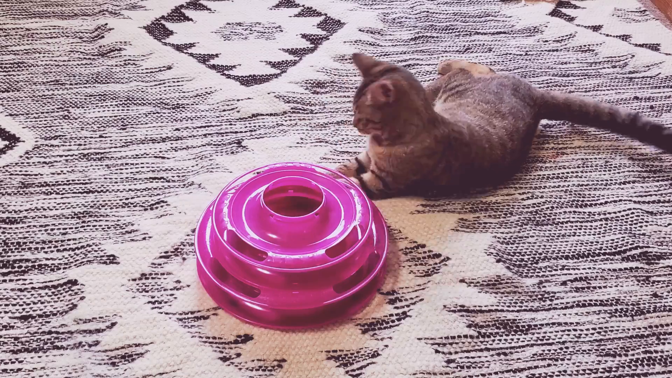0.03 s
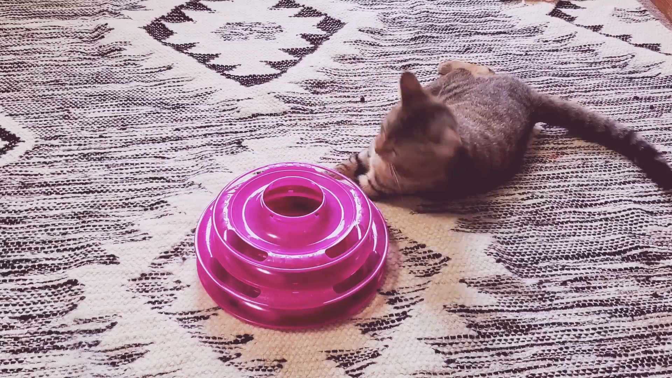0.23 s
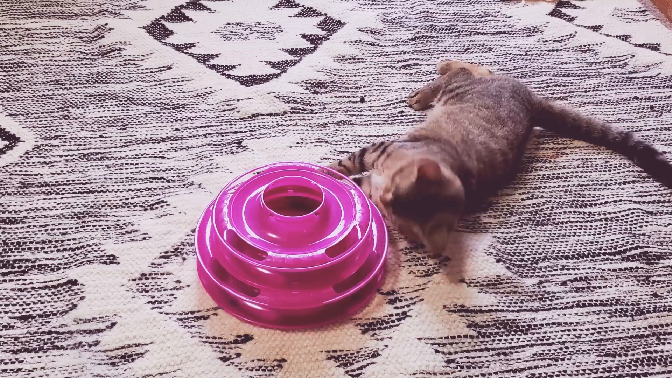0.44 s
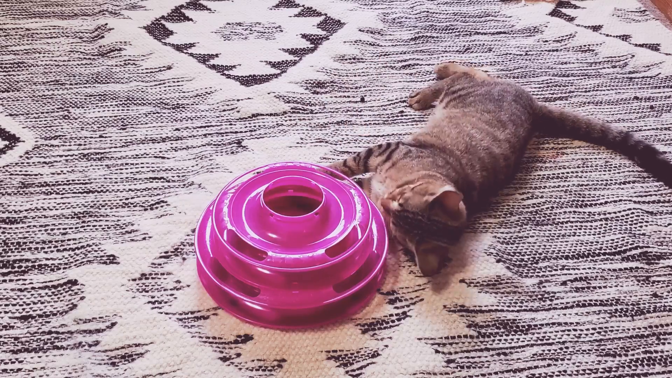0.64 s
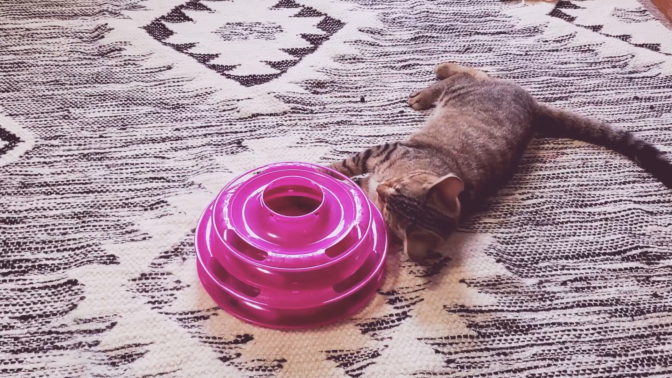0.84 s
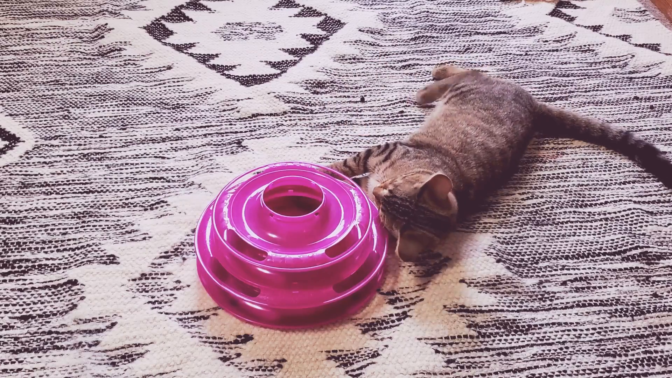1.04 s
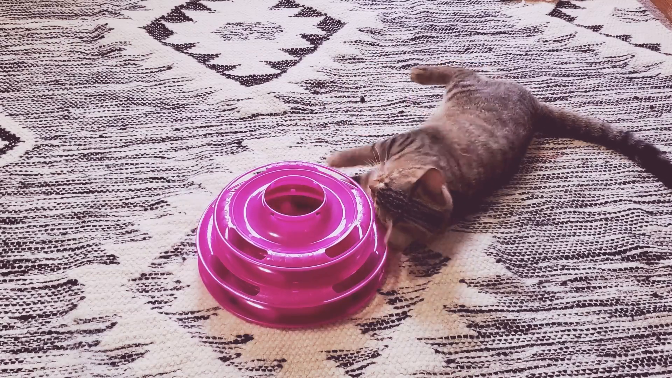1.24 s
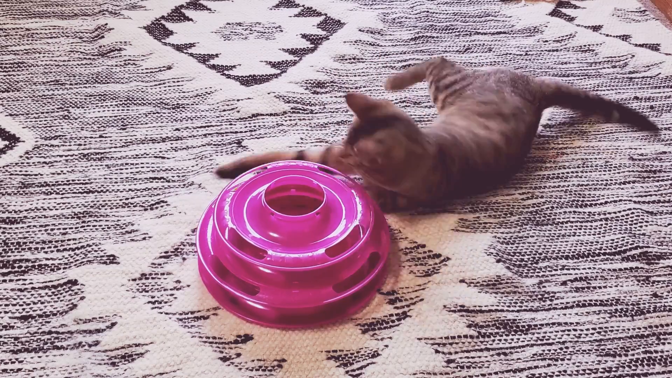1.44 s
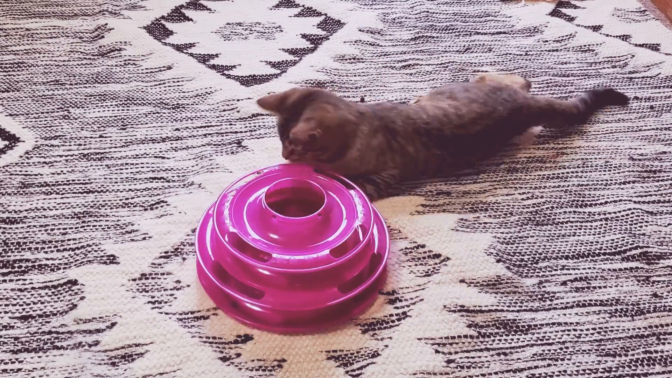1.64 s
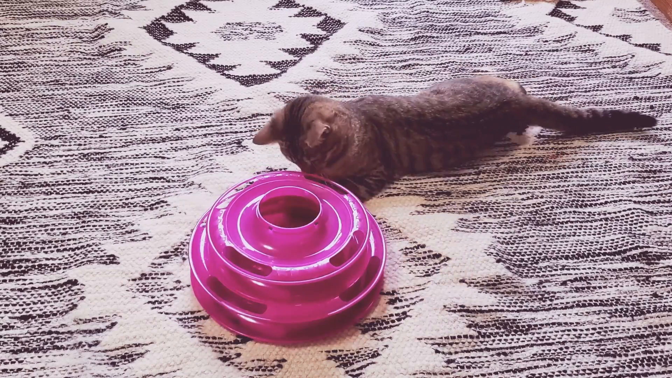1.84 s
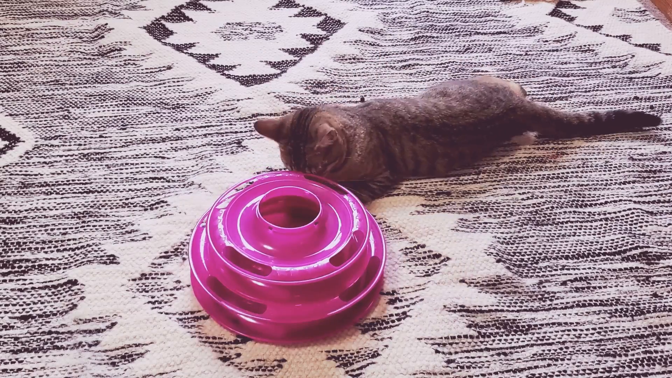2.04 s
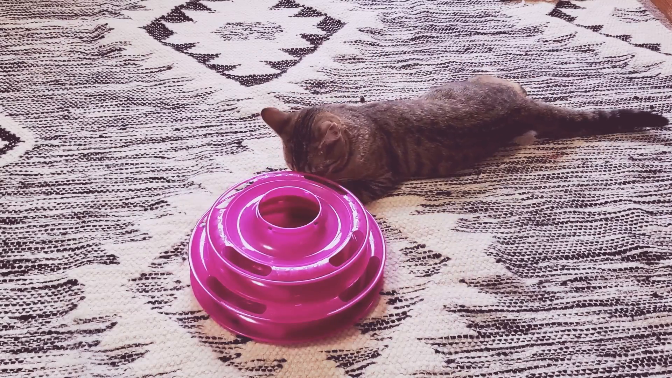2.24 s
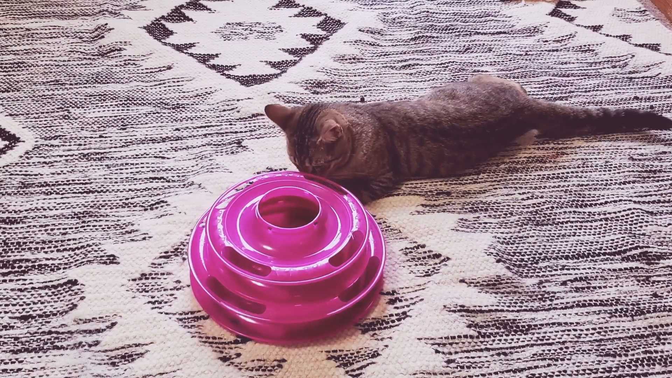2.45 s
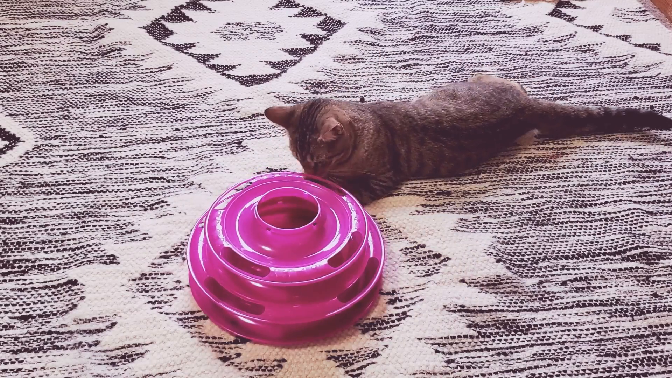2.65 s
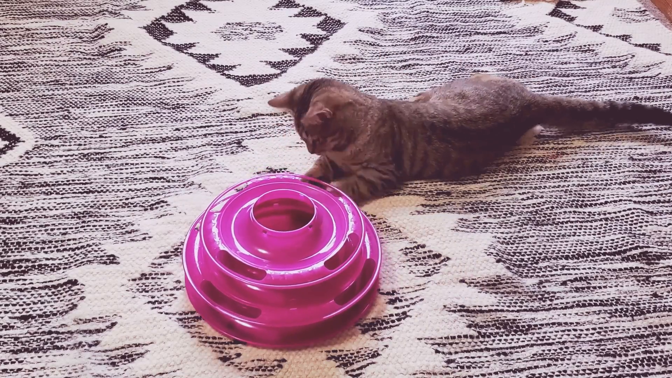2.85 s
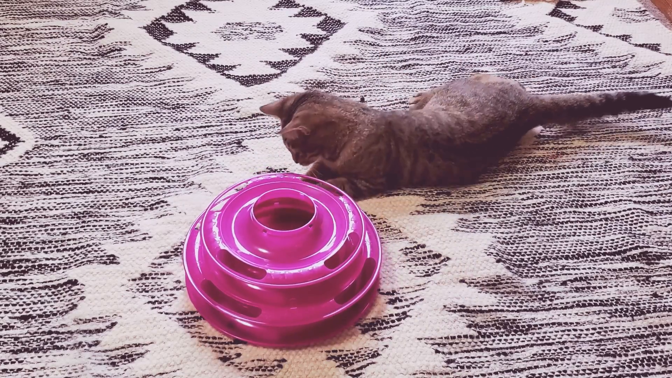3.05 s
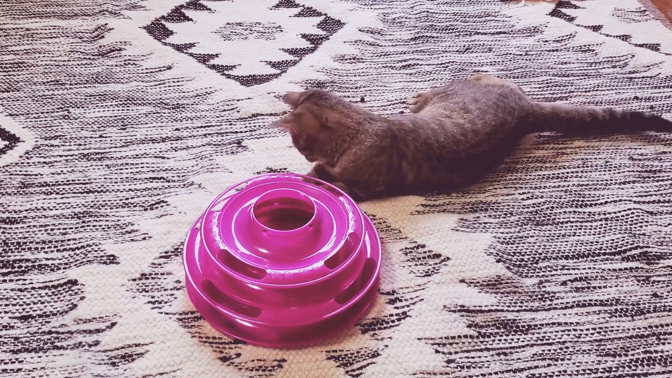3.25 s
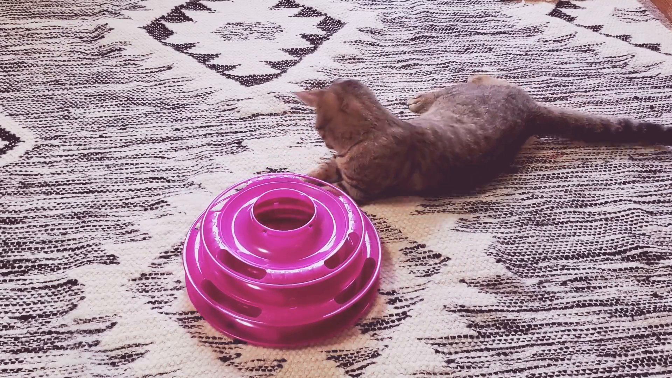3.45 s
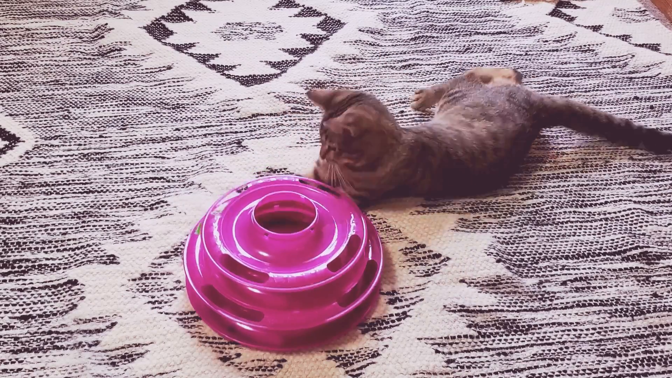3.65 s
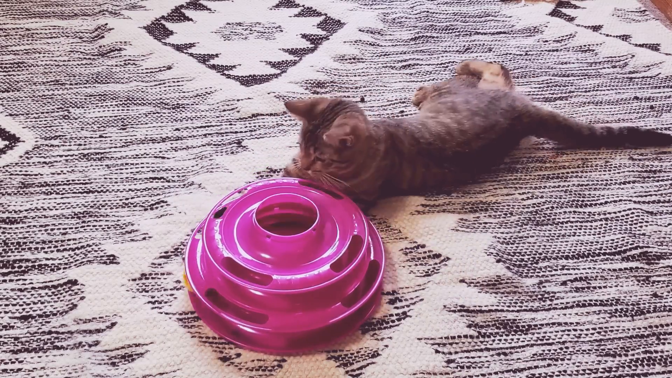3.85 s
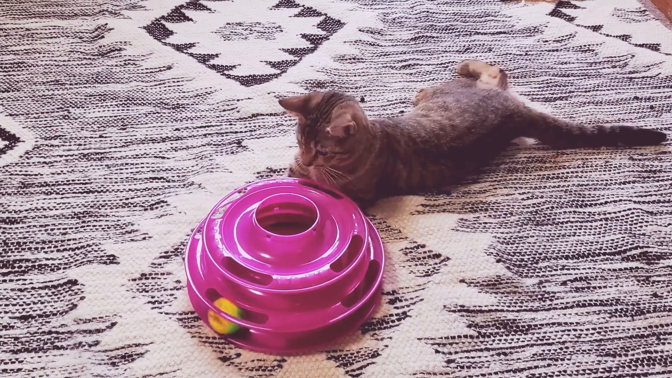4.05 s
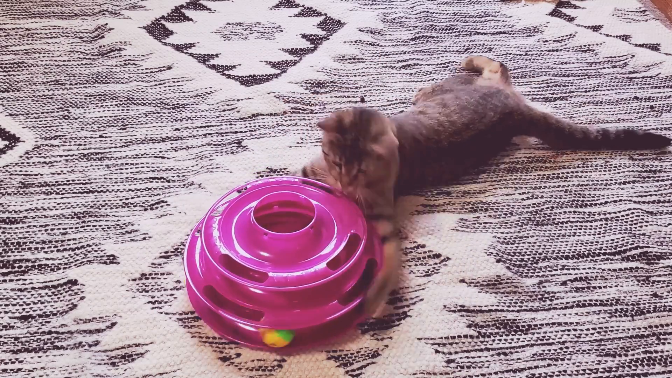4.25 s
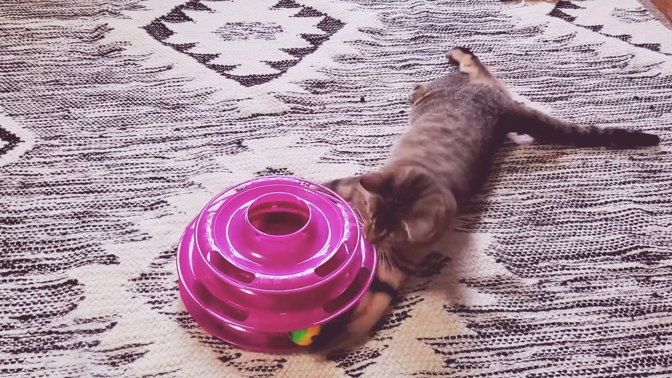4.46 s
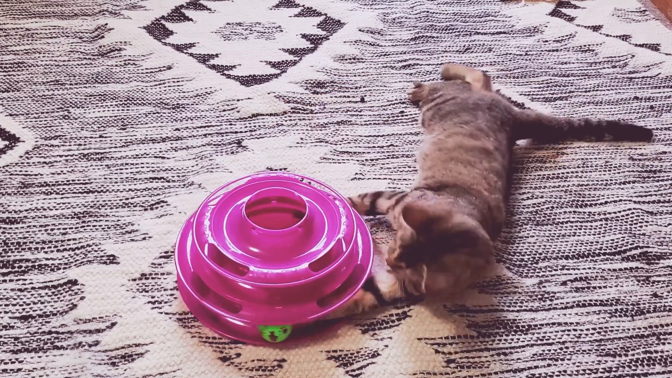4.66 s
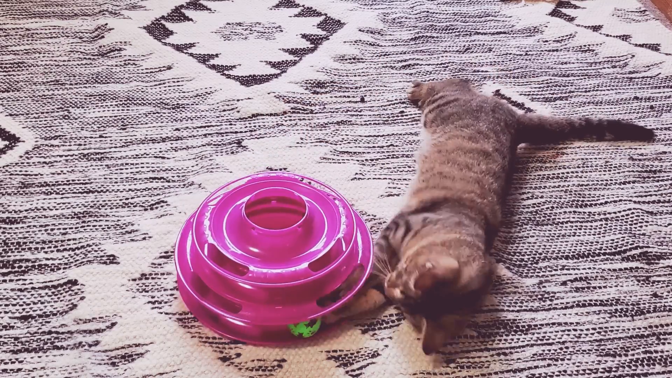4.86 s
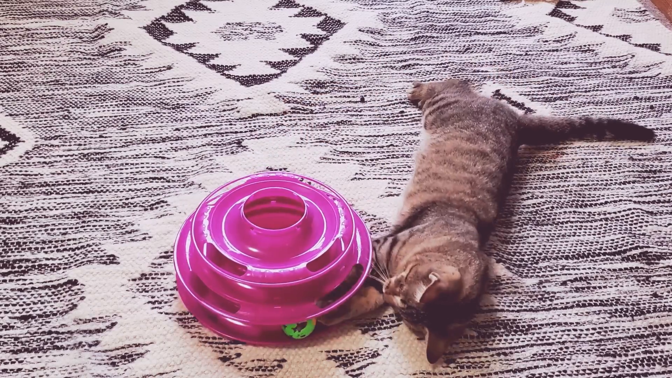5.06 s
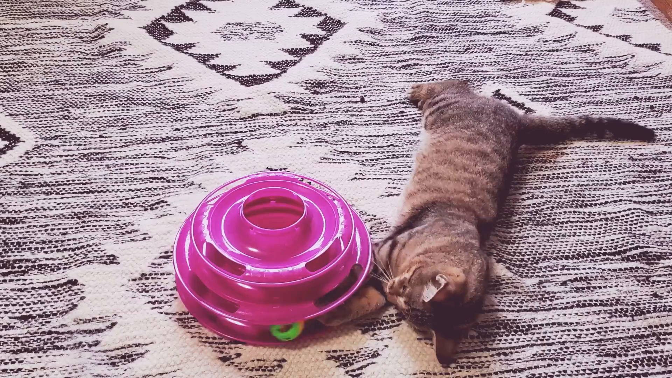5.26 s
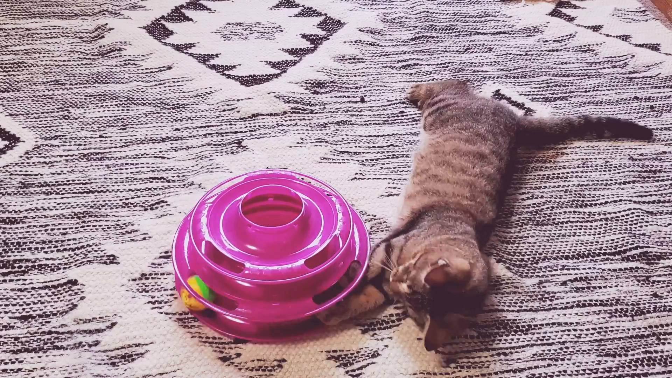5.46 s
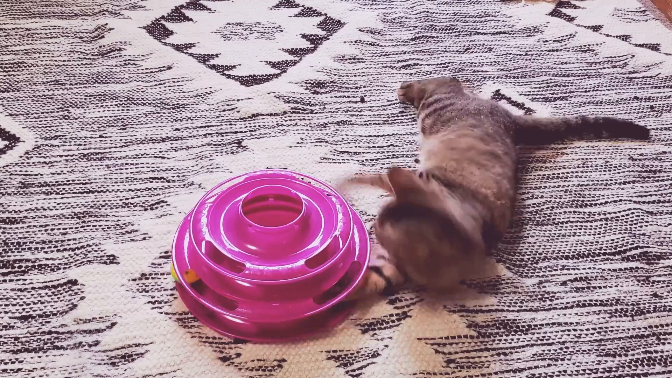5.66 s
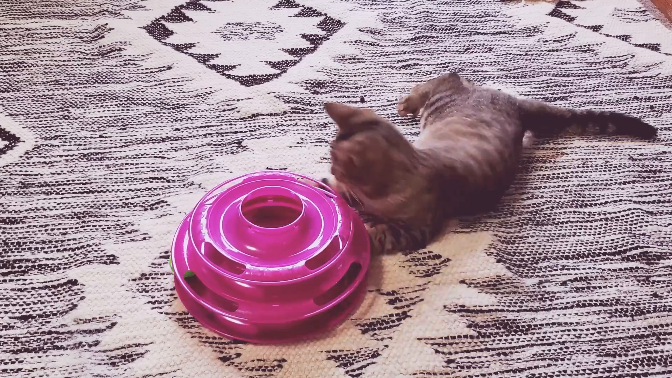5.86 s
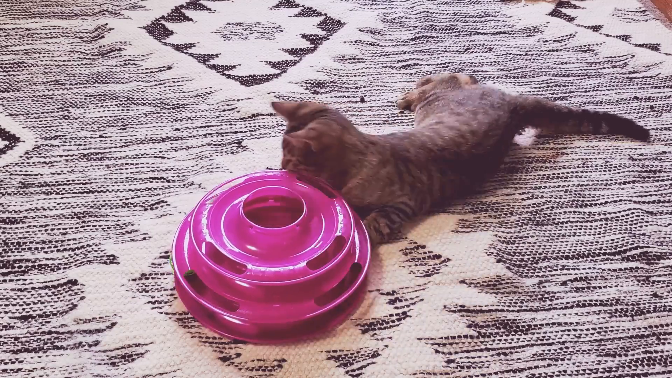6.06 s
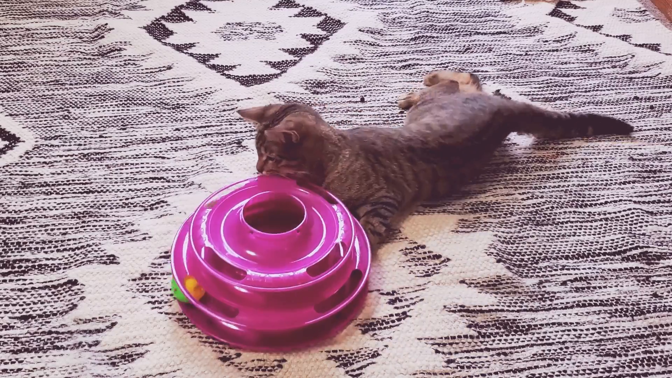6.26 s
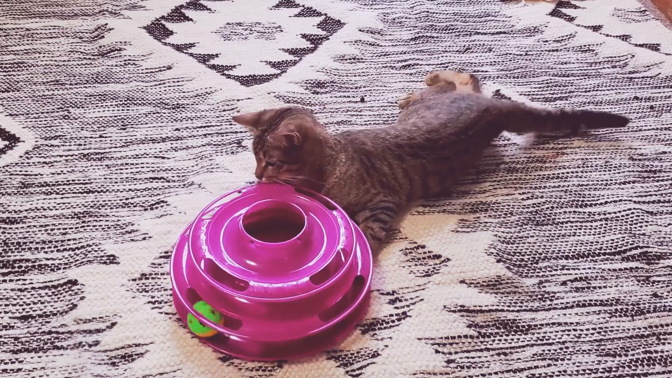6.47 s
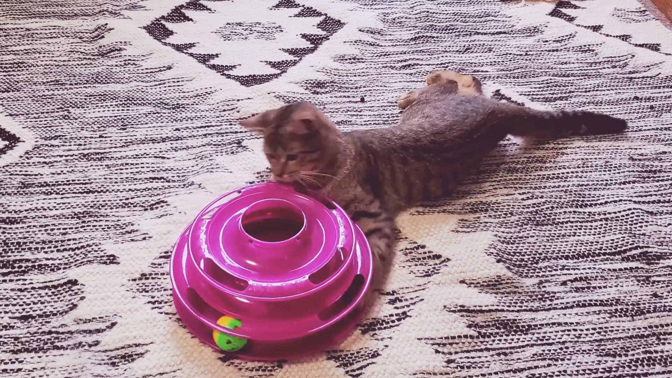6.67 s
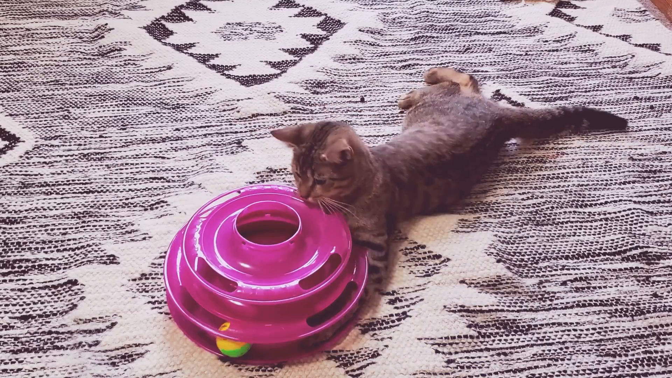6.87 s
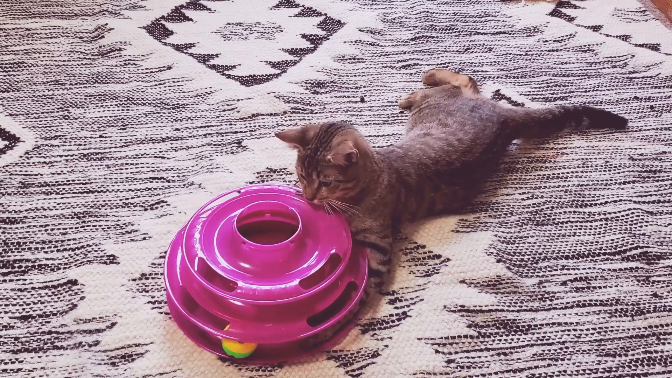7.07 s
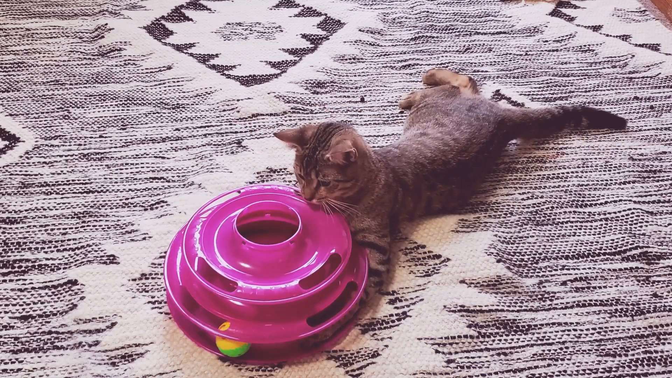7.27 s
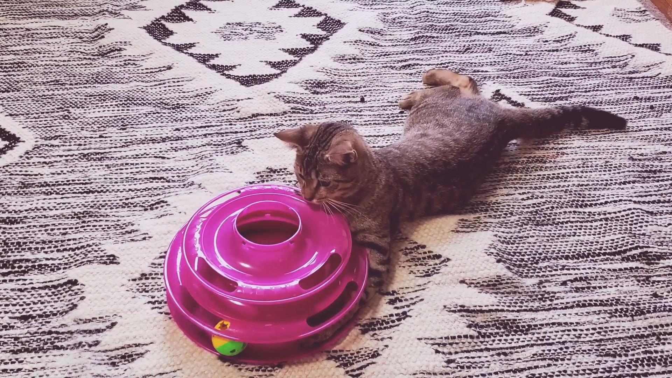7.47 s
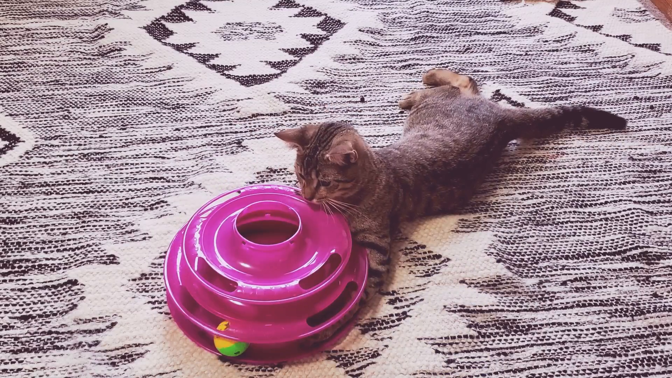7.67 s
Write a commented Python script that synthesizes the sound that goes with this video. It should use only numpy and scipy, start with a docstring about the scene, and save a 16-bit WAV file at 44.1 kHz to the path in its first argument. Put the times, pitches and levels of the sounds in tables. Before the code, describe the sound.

A kitten plays with a hollow plastic ball tower on a rug, heard up close in a small room with a faint low hum. A ball rattles briefly and paws softly brush the rug. Then batted balls roll and knock along the tracks in irregular bursts, with sharp clacks, hollow thuds and tiny jingling bells. The clatter is busiest midway and ends with a soft paw stroke and a few faint knocks.

```python
"""A low hum fills a small room, where a kitten plays with a hollow plastic tower on a rug.
First a plastic ball rumbles briefly in its track: its shell rings and a tiny bell inside jingles.
Paws brush the rug. From about one second on, batted balls roll and knock against the track walls,
so the tower thuds, the walls clack and the shells ping, each with a short echo from the room.
The play is busiest at around four seconds and ends with one more paw stroke and a few faint knocks."""
import sys
import numpy as np
from scipy import signal
from scipy.fft import rfft, irfft, next_fast_len
from scipy.io import wavfile
from scipy.ndimage import uniform_filter1d

SR = 44100
rng = np.random.default_rng(int(sys.argv[2]) if len(sys.argv) > 2 else 0)


def store_pcm(level_fs):
    """Save levels as 16-bit WAV."""
    pcm = np.round(np.clip(level_fs, -1, 1) * 32767).astype(np.int16)
    wavfile.write(sys.argv[1], SR, np.atleast_2d(pcm).T)


N = 340452
TIME = np.arange(N) / SR

# Levels in all tables are relative. A fade_s is the time a sound takes to drop by 60 dB.
# Each run of a ball: start_s, length_s, rumble_db, scrape_db, ring_db, pellet_db, loss_db, ring_hz
RUNS = [(0.0, 0.068, -69, -65, -56, -54.5, 6, 2835), (0.128, 0.1, -81, -75, -69, -70.5, -5.5, 2840),
        (1.065, 0.21, -83, -86, -96, -82, 4.5, 2840), (1.193, 0.21, -63, -65, -48.5, -54.5, 7.5, 2740),
        (1.468, .15, -66, -64.5, -50.5, -52.5, 8, 2906), (1.676, 0.082, -48, -41.5, -45, -48.5, 22.5, 2660),
        (1.79, 0.1, -86, -49, -63, -55, 6.5, 2750), (1.995, 0.068, -90, -58, -61.5, -60, -2, 3030),
        (2.756, 0.037, -71, -67, -65, -70, 7, 2770), (2.842, .23, -75, -65.5, -57.5, -63, -3, 2820),
        (3.132, 0.076, -72, -59.5, -71, -56, 5, 2670), (3.339, 0.2, -85.5, -74, -69, -66, -5.5, 2840),
        (3.423, 0.092, -63.5, -59.5, -56.5, -59, -2.5, 2880),
        (3.474, 0.34, -68.5, -74.5, -45.5, -54, -1.5, 2960),
        (3.799, 0.56, -60, -57, -55.5, -50.5, -4.5, 2560),
        (4.431, 0.088, -58.5, -75, -42.5, -55.5, 8.5, 2740), (4.597, 0.4, -62, -83, -46, -44.5, 19, 2970),
        (5.065, 0.093, -105, -99, -79, -71.5, -9.5, 2670), (5.198, 0.14, -67.5, -103, -55, -55, 17.5, 2750),
        (5.343, 0.46, -58, -56, -51.5, -50.5, 10, 2880),
        (5.864, .12, -80.5, -82.5, -74.5, -58.5, -10, 2900),
        (6.11, 0.048, -73.5, -74.5, -71, -72.5, -2.5, 2844), (6.18, 0.25, -57.5, -61, -48, -61, 5.5, 2600),
        (6.32, 0.29, -64.5, -63, -55.5, -55.5, -3.5, 3100), (6.556, 0.21, -62, -58, -72, -54.5, 10, 2900),
        (6.762, 0.18, -64.5, -60, -51.5, -47.5, 13.5, 2580)]
# The tone of each part, or how strongly it gives out low and high sounds: pitch_hz, level_db
TOWER_TONE = [(90, -40.5), (170, -21), (260, -5.5), (300, -9.5), (345, 0.5), (430, 6), (540, -1.5),
              (690, -8), (900, -12), (1500, -28)]
SHELL_TONE = [(1900, -35), (2550, 6.5), (3000, 5.5), (3700, -5.5), (4400, -11.5), (4900, -2), (5350, -19),
              (6900, -4.5), (8500, -44.5), (15000, -69.5)]
BELL_TONE = [(2000, -46.5), (4300, -13), (5350, -26), (5850, -6), (6250, -13.5), (7100, -1), (7900, -14.5),
             (8500, -17), (9600, -6), (10800, -3), (12700, -5), (15700, -2.5)]


def amp(db):
    """Turns decibels into a number to multiply by."""
    return 10 ** (np.asarray(db) / 20)


def evened(x):
    """Scales a sound to an average power of 1."""
    return x / np.sqrt(np.mean(x ** 2) + 1e-20)


def unit(x):
    """Scales each channel to a total energy of 1."""
    return x / np.sqrt(np.sum(x ** 2, -1, keepdims=True) + 1e-20)


def read(table, hz):
    """Looks up a value between the pitches of a table, spaced as on a keyboard."""
    pitch_hz, value = np.transpose(table)
    return np.interp(np.log(hz + 1), np.log(pitch_hz + 1), value)


def add(mix, start_s, sound):
    """Mixes a sound in at the given time."""
    part = mix[..., max(round(start_s * SR), 0):][..., :sound.shape[-1]]
    part += sound[..., :part.shape[-1]]


def through(x, response):
    """Lets every sample of x set off the response (convolution), keeping the length."""
    drive, response = (np.atleast_2d(sound).astype(np.float32) for sound in (x, response))
    return signal.oaconvolve(drive, response, axes=1)[:, :x.shape[-1]]


def tap_response(tone, size=2048):
    """How a part with this tone answers one perfectly sharp tap."""
    log_gain = np.log(amp(read(tone, abs(np.fft.fftfreq(size, 1 / SR)))))
    spectrum = np.exp(np.conj(signal.hilbert(log_gain)))  # nothing sounds before the tap
    return unit(np.fft.ifft(spectrum).real[:size // 2])


def shaped(x, tone):
    """Gives a long sound a tone without delaying it."""
    size = next_fast_len(N, True)
    gain = amp(read(tone, np.fft.rfftfreq(size, 1 / SR)))
    return irfft(rfft(x, size) * gain, size)[..., :N]


def still_room():
    """A low rumble, a faint hiss and a wavering hum, there from start to end."""
    air_tone = [(22, -102.5), (39, -77.5), (52, -79), (80, -77), (130, -99), (190, -90), (320, -105),
                (900, -109), (1500, -108), (2300, -115), (3000, -113), (4000, -120), (5500, -126),
                (7300, -126), (8400, -138), (11500, -126), (15700, -122)]  # the room's steady noise: pitch_hz, level_db
    hum_notes = [(66, -79), (540, -92), (805, -99.5), (1570, -91.5)]  # the notes in the hum: pitch_hz, level_db
    air = amp(-0.5) * np.sqrt(SR / 2) * shaped(rng.standard_normal((2, N)), air_tone)
    for hz, db in hum_notes:
        waver_hz = 5 * evened(uniform_filter1d(rng.standard_normal(N), size=3000))
        air += amp(db) * evened(np.sin(2 * np.pi * np.cumsum(hz + waver_hz) / SR))
    return air


def spot(crack_s, ring_s, ring_db, size=2048):
    """One spot is hit: a brief crack, then a dense ring with the tone of that crack."""
    t, noise = TIME[:size], rng.standard_normal((3, size))
    crack = unit(noise[0] * t * np.exp(-t / crack_s))
    tail = noise[1:] * np.exp(-t / ring_s)
    ring = irfft(rfft(tail, 2 * size) * rfft(crack, 2 * size))
    return np.pad(crack, (0, size)) + amp(ring_db) * unit(ring)


def bumps(per_s, spread_db=4.5, smooth_s=0.08):
    """The small random bumps of a rolling ball: uneven in size, but steady on average."""
    hits = (rng.random(N) < per_s / SR) * amp(spread_db * np.clip(rng.standard_normal(N), -2, 2))
    hits *= rng.choice([-1, 1], N)
    window = unit(signal.windows.hann(int(smooth_s * SR))) ** 2
    nearby_power = signal.fftconvolve(hits ** 2, window, "same")
    return hits / np.sqrt(abs(nearby_power) + np.mean(hits ** 2) / 20)


def patter(tone, hits, crack_s, ring_s, ring_db, spot_count=16):
    """Tiny hits on a part; the turning ball shifts the contact among a few spots."""
    body = tap_response(tone)
    touching = rng.integers(0, spot_count, N)[(TIME / 0.025).astype(int)]  # picked every 25 ms
    spots = [unit(through(spot(crack_s, ring_s, ring_db), body)) for _ in range(spot_count)]
    out = np.zeros((2, N))
    for i in np.flatnonzero(hits):
        add(out, TIME[i], hits[i] * spots[touching[i]])
    return out


def run_loudness(levels_db, loss_share=1, rise_s=0.006, stop_db_per_s=319.5):
    """A ball gets going quickly and rocks to rest; on the way it fades, or swells if loss_db < 0."""
    power, t = np.zeros(N), TIME[:SR]
    for (start_s, length_s, *_, loss_db, ring_hz), db in zip(RUNS, levels_db):
        slowing_db = loss_share * loss_db * np.minimum(t / length_s, 1)
        stopping_db = stop_db_per_s * np.maximum(t - length_s, 0)
        add(power, start_s, (np.minimum(t / rise_s, 1) * amp(db - slowing_db - stopping_db)) ** 2)
    return np.sqrt(power)


def rolling():
    """Ribbed balls bump along as their pellets tumble. Gives the sound and taps on shells and bells."""
    scrape_tone = [(450, -6), (800, -13), (1000, -10), (1400, 10.5), (1900, 8.5), (2300, 0.5), (3400, 8),
                   (4500, -8), (6000, -14.5)]  # a ball rubbing the wall: pitch_hz, level_db
    rumble_db, scrape_db, ring_db, pellet_db = np.transpose(RUNS)[2:6]
    jolts = amp(31) * (rng.random(N) < 15 / SR)  # a ball jumps a little about 15 times a second
    track_hits = run_loudness(rumble_db, loss_share=0.86) * (bumps(per_s=180) + jolts)
    rumble = amp(-2) * patter(TOWER_TONE, track_hits, crack_s=0.0014, ring_s=0.0065, ring_db=1)
    wall_hits = run_loudness(scrape_db) * (bumps(per_s=140) + jolts)
    scrape = amp(-1) * patter(scrape_tone, wall_hits, crack_s=0.00027, ring_s=0.0025, ring_db=8)
    pellet_hits = run_loudness(pellet_db, loss_share=0.63) * (bumps(per_s=140) + jolts)
    rattle = amp(-0.5) * patter(BELL_TONE, pellet_hits, crack_s=0.001, ring_s=0.0038, ring_db=4.5)
    rib_hits = run_loudness(ring_db) * (bumps(per_s=220) + jolts)
    whirr = amp(-18) * patter(SHELL_TONE, rib_hits, crack_s=0.00094, ring_s=0.01, ring_db=6)
    return rumble + scrape + rattle + whirr, amp(-3.5) * rib_hits, amp(-12.5) * pellet_hits


def ringing(hz, fade_s):
    """One pure, fading note; it reaches each ear at a different point in its wave."""
    t = TIME[:int(fade_s * SR)]
    return unit(amp(-60 * t / fade_s) * np.sin(2 * np.pi * (hz * t + rng.random((2, 1)))))


def shells(taps, hop_s=0.05, hop_hz=90):
    """The shells ring; as a spinning ball turns another side to the wall, its ring hops in pitch."""
    notes = [(2600, 19, 0.018), (2910, 0, 0.055), (2750, -6, 0.017), (2943, 17.5, 0.027),
             (3010, -10.5, 0.032), (3230, 3, 0.044), (3230, 1.5, .04)]  # the shells' own notes: pitch_hz, level_db, fade_s
    start_s, length_s, *_, ring_hz = np.transpose(RUNS)
    hops = np.clip(rng.standard_normal(N), -2, 2)[(TIME / hop_s).astype(int)]
    centre_hz = np.interp(TIME, start_s + length_s / 2, ring_hz) + hop_hz * hops
    # notes near the centre pitch get more of each tap
    shares = np.array([amp(db) / (1 + ((centre_hz - hz) / 110) ** 2) for hz, db, _ in notes])
    shares /= np.linalg.norm(shares, axis=0)
    return sum(through(taps * share, ringing(hz, fade_s))
               for share, (hz, _, fade_s) in zip(shares, notes))


def bells(taps):
    """Each note of the tiny bells swells and fades as the ball spins; close pairs shimmer."""
    notes = [(4940, -10, .12), (5740, -8, .06), (5865, -5, .16), (5910, -8, .1), (7940, -10, .05),
             (9930, -9, .15), (11540, -5, .2), (11595, -8, .14), (12650, -8, .04)]  # the bells' own notes: pitch_hz, level_db, fade_s
    spin_s = np.arange(0, TIME[-1] + 1, 0.04)
    facing = amp(5 * np.clip(rng.standard_normal((len(notes), len(spin_s))), -2, 1))
    return sum(amp(db) * np.interp(TIME, spin_s, gain) * through(taps, ringing(hz, fade_s))
               for (hz, db, fade_s), gain in zip(notes, facing))


def room_echo(sound, first_s):
    """Sound bounces round the small room; the low pitches last longest."""
    fade_times = [(200, 0.38), (700, 0.12), (1800, 0.12), (4600, 0.16), (12000, 0.17)]  # how long the echo lasts: pitch_hz, fade_s
    size = SR // 2
    bounces = rng.standard_normal((2, size)) * (rng.random((2, size)) < 0.12) * (TIME[:size] > first_s)
    hz, t, bands = signal.stft(bounces, SR, nperseg=256)
    tail = signal.istft(bands * amp(-60 * t / read(fade_times, hz)[:, None]), SR)[1]
    return through(sound, unit(tail))


def paws():
    """Paws brush the rug in soft, dull strokes."""
    strokes = [(0.317, 0.21, -68), (0.51, 0.19, -69.5), (7.096, 0.28, -73)]  # each stroke of a paw: start_s, length_s, level_db
    rug_tone = [(80, -12.5), (180, -8), (270, -5.5), (400, -23), (1500, -23), (5000, -32), (9000, -99.5)]  # the brushed rug: pitch_hz, level_db
    level = np.zeros(N)
    for start_s, length_s, db in strokes:
        add(level, start_s, amp(db) * signal.windows.tukey(int(length_s * SR), 0.6))
    return level * evened(shaped(rng.standard_normal((2, N)), rug_tone))


def blows(times, levels_db, tone, crack_s, ring_s, ring_db, size=5120):
    """Single knocks on a part, each landing on another spot."""
    out, body = np.zeros((2, N)), rfft(tap_response(tone), size)
    for start_s, db in zip(times, levels_db):
        knock = irfft(rfft(spot(crack_s, ring_s, ring_db), size) * body)
        add(out, start_s, amp(db) * unit(knock))
    return out


def knocks():
    """Balls hit the wall and pellets hit their bells. Gives the sound and taps on shells and bells."""
    # a ball hits the wall: start_s, tower_thud_db, wall_clack_db, shell_ping_db, bell_chink_db
    wall_hits = [(0.967, -40.5, -53, -91, -89), (1.2033, -39, -28, -31.5, -21),
                 (1.2311, -21.5, -26.5, -40, -29), (1.3582, -51, -34, -15, -36),
                 (1.4601, -40.5, -39.5, -25.5, -24), (1.5348, -35, -23.5, -17.5, -13.5),
                 (1.5609, -31.5, -26, -12, -29.5), (1.649, -26, -57, -12, -21.5),
                 (1.6538, -31.5, -15.5, -10, -10.5), (1.7263, -18.5, -8.5, -19, -12.5),
                 (1.7429, -68.5, -16, -6, -25), (1.9566, -46, -24, -19.5, -27),
                 (1.9775, -41.5, -27.5, -22.5, -25.5), (1.9996, -48.5, -22, -16.5, -26),
                 (2.1817, -50, -36.5, -21, -46), (2.2356, -52.5, -35, -30, -44.5),
                 (2.2793, -62, -37, -44, -47), (2.7442, -33, -48, -30.5, -34),
                 (2.8713, -21, -33, -20.5, -43), (2.9116, -39, -53, -20, -17),
                 (3.4424, -34.5, -26.5, -29.5, -25), (3.6206, -20.5, -16.5, -7, -4.5),
                 (3.6278, -29.5, -29, -3.5, -21), (3.6497, -27, -16, -27, -24.5),
                 (3.7377, -20, -20, -9.5, -16), (4.083, -23.5, -22, -17, -32.5),
                 (4.2746, -14.5, -20.5, -13.5, -7.5), (4.2937, -19, -21, -35, -30.5),
                 (4.3034, -13.5, -19.5, -17.5, -3.5), (4.4207, -33, -31, -13, -16),
                 (4.4622, -23.5, -10.5, -15, -3.5), (4.5047, -13.5, -14.5, -3.5, -1),
                 (4.5264, -10.5, -14, -14, -12), (4.5359, -11, -12, -6, 4.5), (4.5819, -27, -18.5, -7, -4),
                 (5.3311, -36, -37, -19, -9), (5.5013, -20.5, -31, -26.5, -13),
                 (5.773, -26, -10.5, 3.5, -10.5), (6.084, -34, -40, -38.5, -67),
                 (6.1739, -28.5, -19.5, -16, -10), (6.2769, -24, -24, -39, -20),
                 (6.3041, -19.5, -29.5, -42, -27), (6.3109, -20.5, -17, -40, -10),
                 (6.563, -31, -15.5, -17, -14.5), (6.5718, -37.5, -26, -9.5, -21.5),
                 (6.7779, -50, -37, -28, -17), (6.8054, -55, -29, -29, -27), (7.2139, -59, -35.5, -36, -46),
                 (7.3408, -63, -33, -38, -35), (7.6451, -70.5, -40.5, -49, -49)]
    pellet_drops = [(1.2481, -14.5), (1.3043, -10), (1.485, -31), (1.7807, -12), (2.9842, -18.5),
                    (3.1434, -30), (3.1809, -19), (3.5684, -11), (3.8138, -10.5), (3.862, -12),
                    (3.9181, -9), (3.9848, -5.5), (4.053, -6.5), (4.1034, -10), (4.237, -6), (4.65, -15.5),
                    (4.9845, -16.5), (5.214, -25), (5.3477, -14), (5.528, -7), (6.6083, -12),
                    (6.7493, -21.5), (6.8576, -20.5)]  # a pellet drops against its bell: start_s, level_db
    wall_tone = [(500, -19), (900, -18), (1400, -2), (1900, 2), (2250, -4), (2600, -34), (3500, -7.5),
                 (7000, -40.5)]  # the struck track wall: pitch_hz, level_db
    snap_tone = [(1500, -43), (3500, -4), (4600, -7), (5600, -1.5), (7000, 1), (9000, -7.5), (15000, -4.5)]  # the dry snap of contact: pitch_hz, level_db
    # a little of each drop reaches the tower, the wall and the shell
    drops = [(start_s, db - 26.5, db - 28.5, db - 10.5, db) for start_s, db in pellet_drops]
    times, thud_db, clack_db, ping_db, chink_db = np.transpose(list(wall_hits) + drops)
    thud = amp(-2) * blows(times, thud_db, TOWER_TONE, crack_s=0.0022, ring_s=0.0083, ring_db=-3)
    clack = amp(0.5) * blows(times, clack_db, wall_tone, crack_s=0.0003, ring_s=0.014, ring_db=0)
    ping = amp(-3) * blows(times, ping_db, SHELL_TONE, crack_s=0.00036, ring_s=0.007, ring_db=-2)
    chink = amp(-1.5) * blows(times, chink_db, BELL_TONE, crack_s=0.00072, ring_s=0.0022, ring_db=2.5)
    # a hard blow has a shorter contact, so its snap grows faster than its ping
    snap = amp(-6) * blows(times, 1.3 * ping_db, snap_tone, crack_s=0.0002, ring_s=0.004, ring_db=-2)
    # a ball pressed hard against the wall is muffled, so its ring grows more slowly
    shell_taps = blows(times, 0.8 * ping_db, SHELL_TONE, crack_s=0.00083, ring_s=0.0075, ring_db=-2.5)
    return thud + clack + ping + chink + snap, amp(-21.5) * shell_taps, amp(-16.5) * chink


def scene():
    """The toy and the paws, their echo, and the still room."""
    plastic, shell_taps, bell_taps = (hit + roll for hit, roll in zip(knocks(), rolling()))
    play = plastic + shells(shell_taps) + bells(bell_taps) + paws()
    return play + amp(-2) * room_echo(play, first_s=0.0028) + still_room()


def record(dry):
    """Two close microphones hear nearly the same bass; the left is a little early, the right brighter."""
    width = [(30, -19), (125, -11.5), (450, -7.5), (1000, -2), (2000, -6.5), (4000, -2), (16000, 2.5)]  # how wide the sound spreads between the ears: pitch_hz, side_gain_db
    balance = [(1000, 0.5), (2500, 0.5), (4500, -3), (7500, -5.5), (10000, -0.5), (13000, -2.5),
               (15700, -2)]  # how much louder the left is than the right: pitch_hz, level_db
    middle, side = dry.mean(0), shaped((dry[0] - dry[1]) / 2, width)
    left = shaped(middle + side, [(hz, db / 2) for hz, db in balance])
    right = shaped(middle - side, [(hz, -db / 2) for hz, db in balance])
    pair = np.array([left, np.pad(right, (3, 0))[:N]])
    treble_cut = signal.firwin(511, 15850, window=("kaiser", 8), fs=SR)  # cuts above 15850 Hz
    return signal.oaconvolve(pair, treble_cut[None], "same")


dry = scene()
out = record(dry)
store_pcm(out)
```